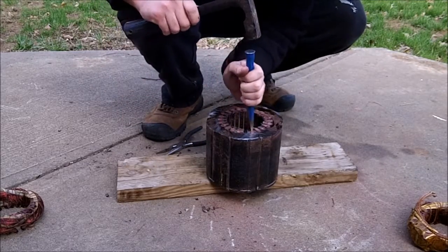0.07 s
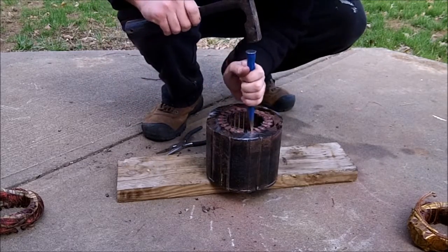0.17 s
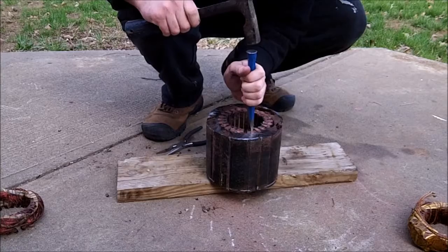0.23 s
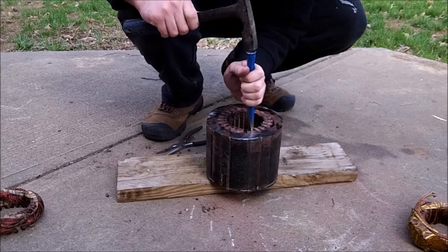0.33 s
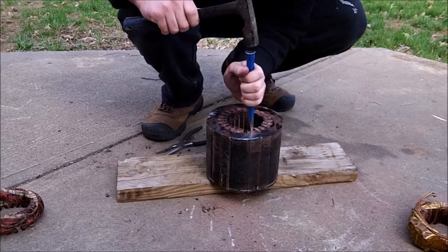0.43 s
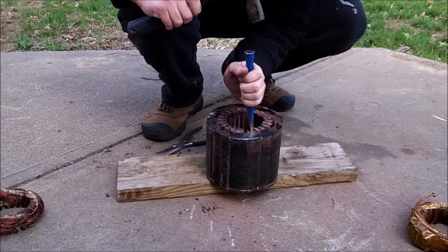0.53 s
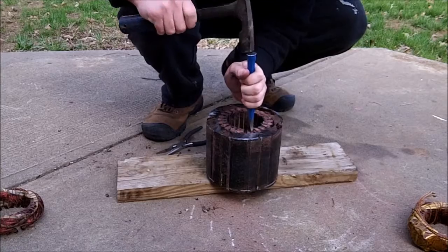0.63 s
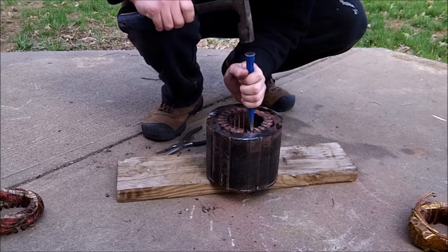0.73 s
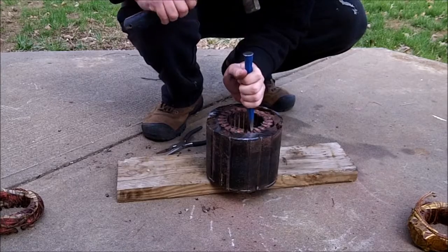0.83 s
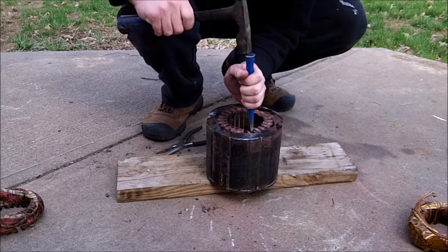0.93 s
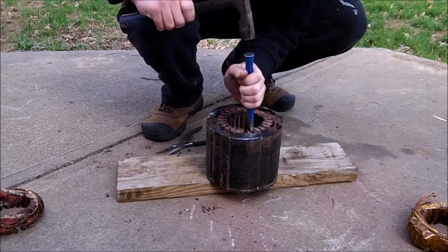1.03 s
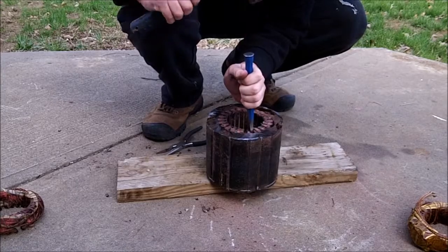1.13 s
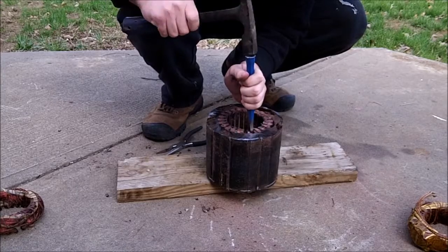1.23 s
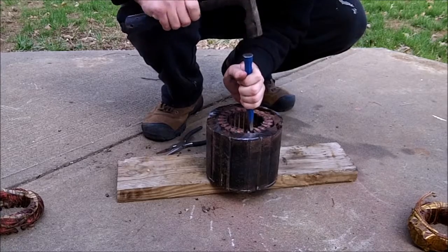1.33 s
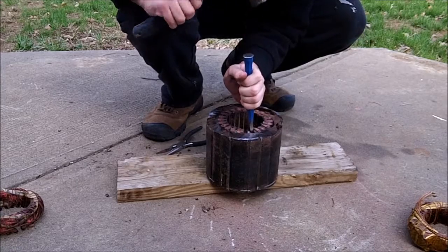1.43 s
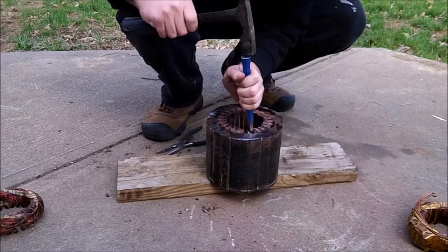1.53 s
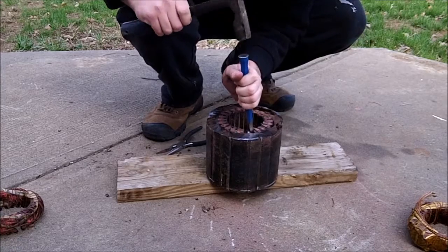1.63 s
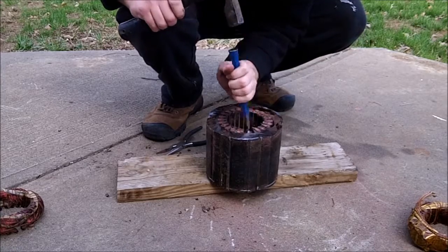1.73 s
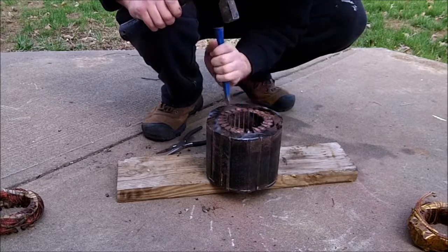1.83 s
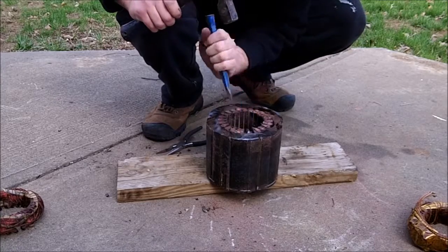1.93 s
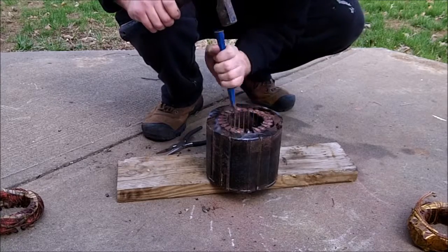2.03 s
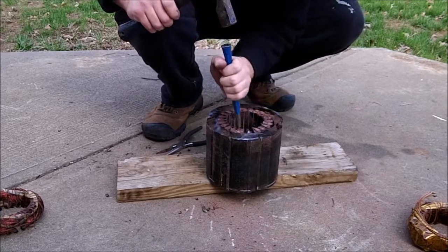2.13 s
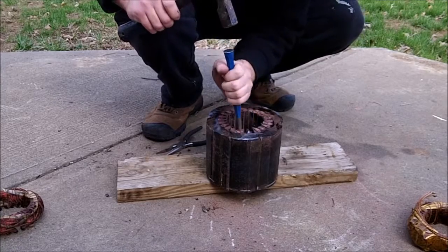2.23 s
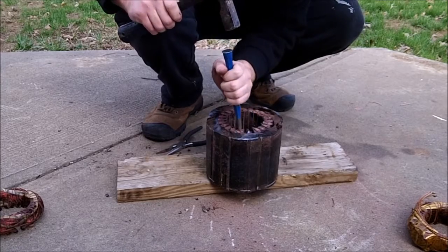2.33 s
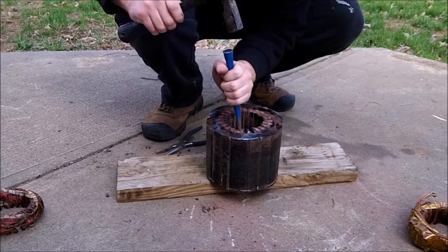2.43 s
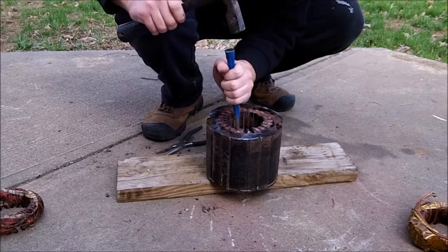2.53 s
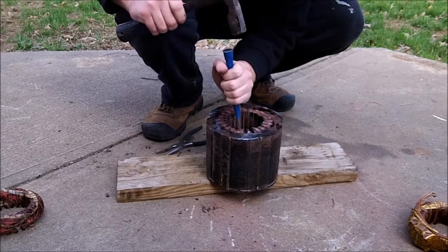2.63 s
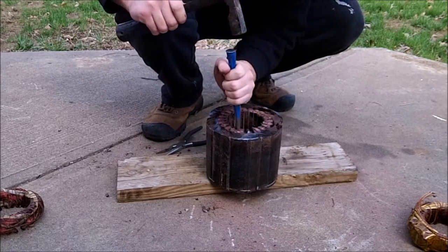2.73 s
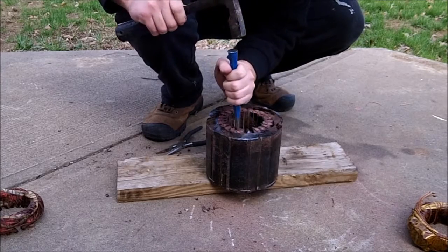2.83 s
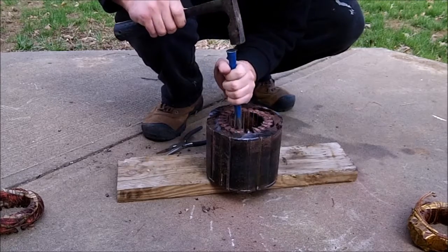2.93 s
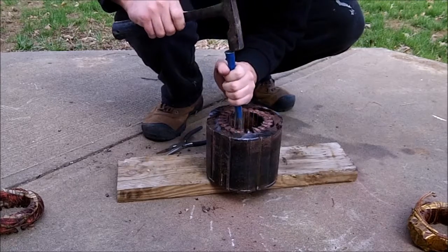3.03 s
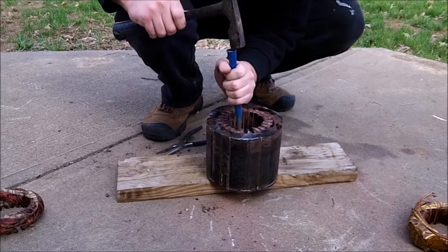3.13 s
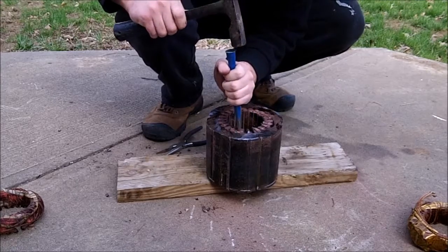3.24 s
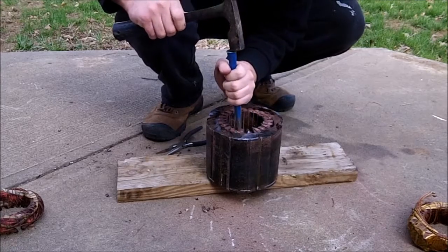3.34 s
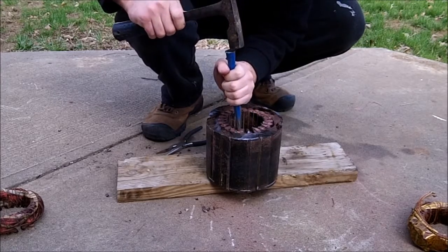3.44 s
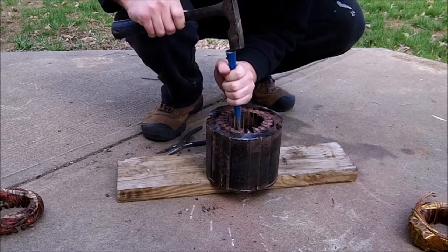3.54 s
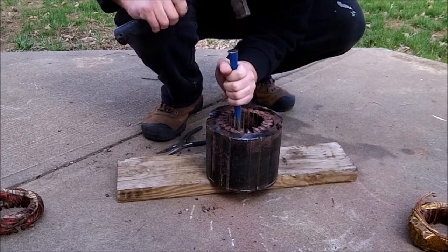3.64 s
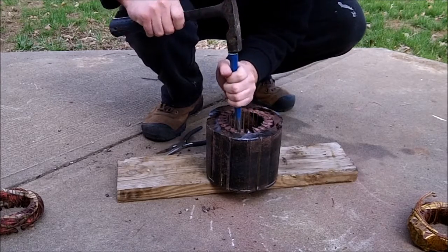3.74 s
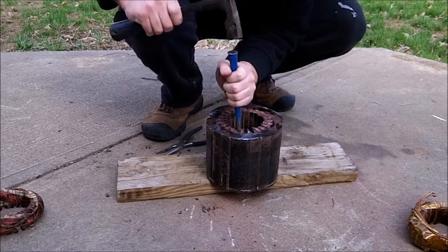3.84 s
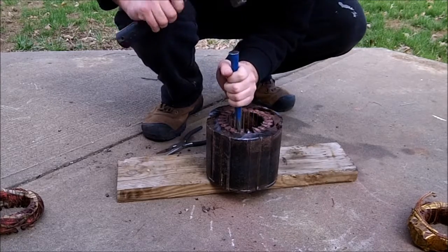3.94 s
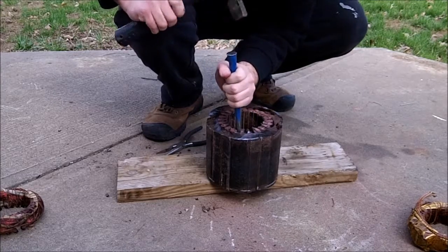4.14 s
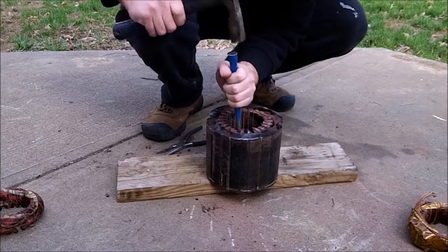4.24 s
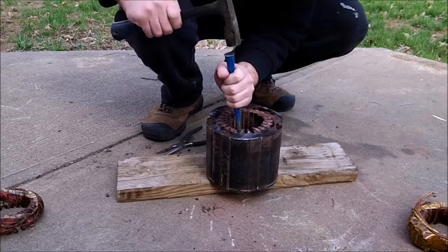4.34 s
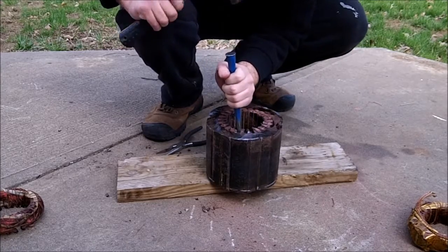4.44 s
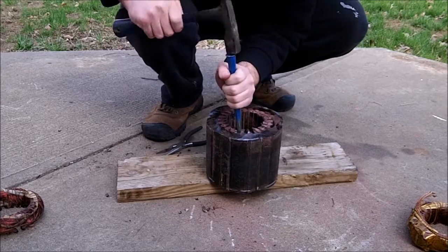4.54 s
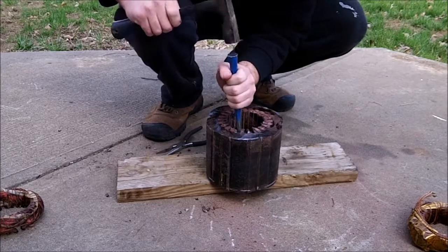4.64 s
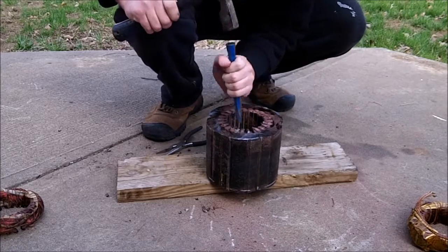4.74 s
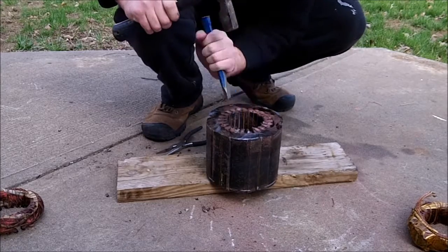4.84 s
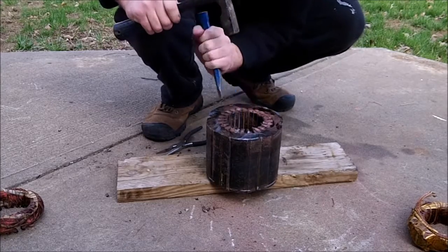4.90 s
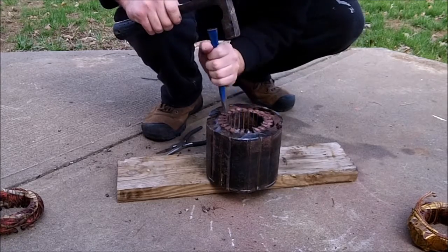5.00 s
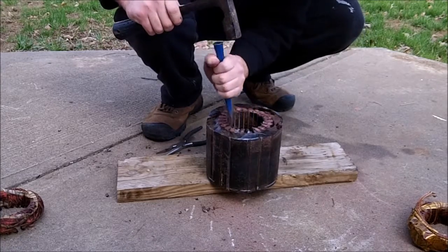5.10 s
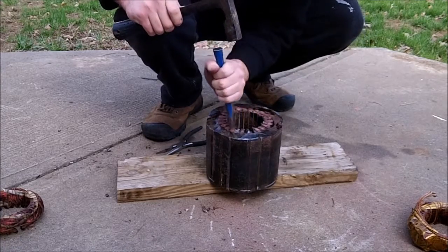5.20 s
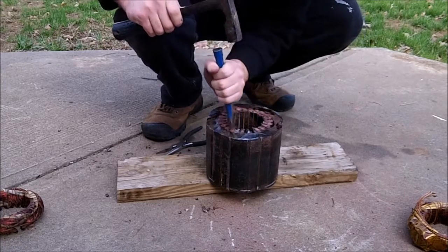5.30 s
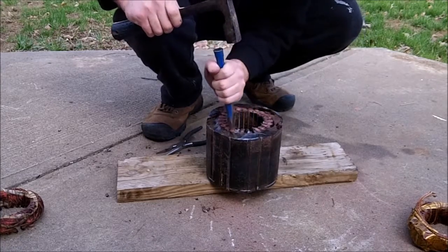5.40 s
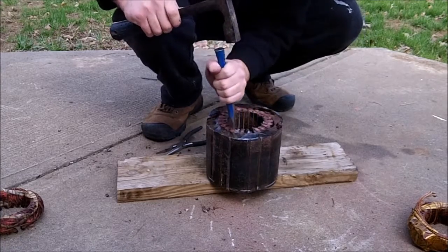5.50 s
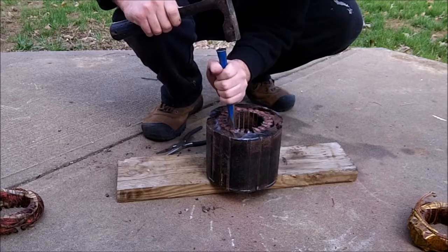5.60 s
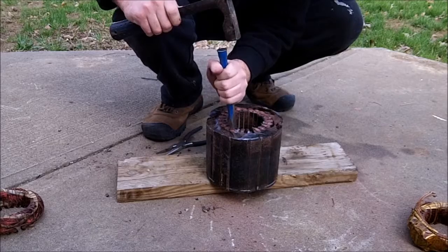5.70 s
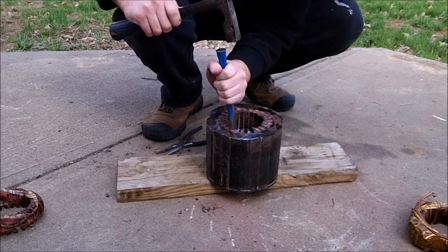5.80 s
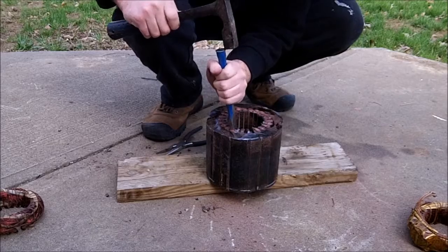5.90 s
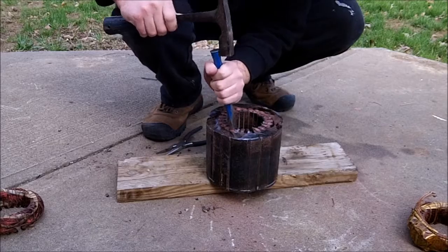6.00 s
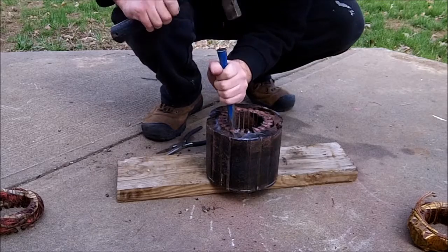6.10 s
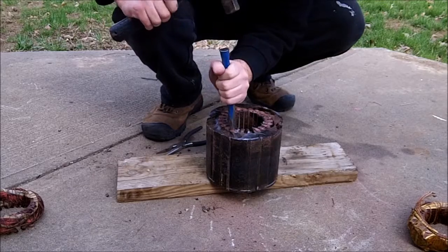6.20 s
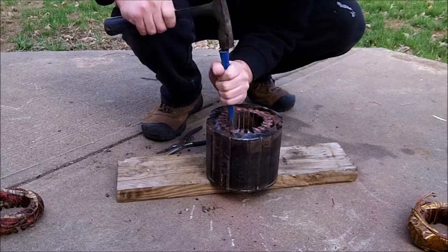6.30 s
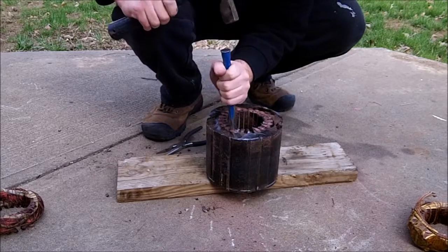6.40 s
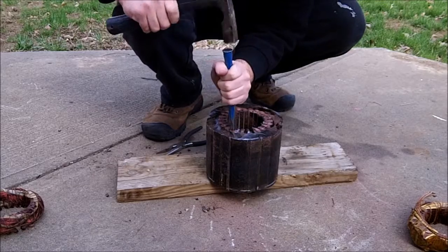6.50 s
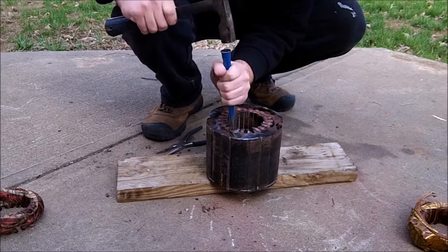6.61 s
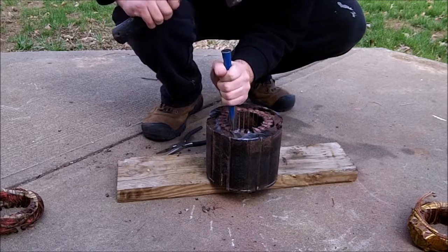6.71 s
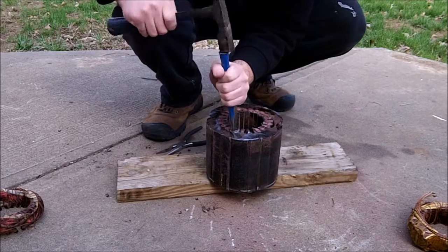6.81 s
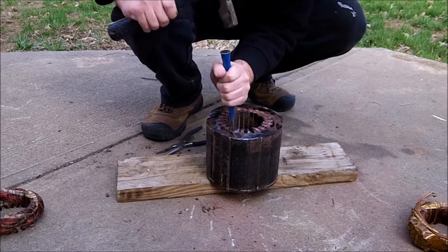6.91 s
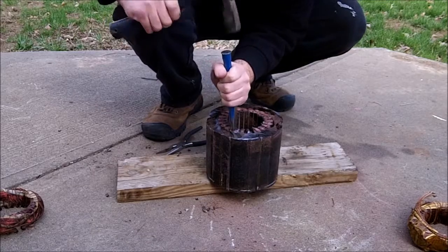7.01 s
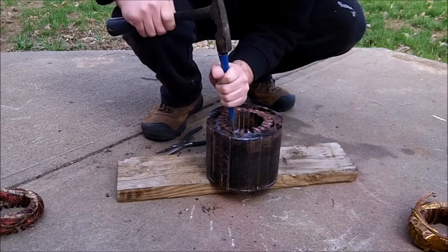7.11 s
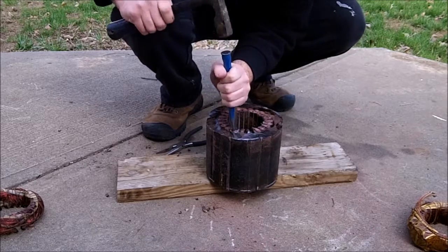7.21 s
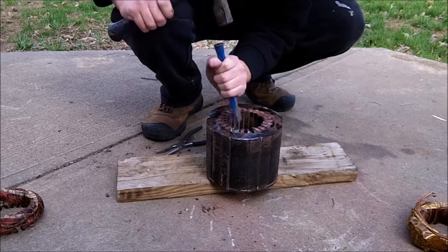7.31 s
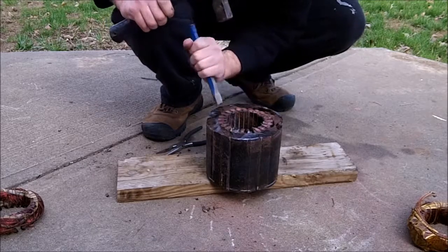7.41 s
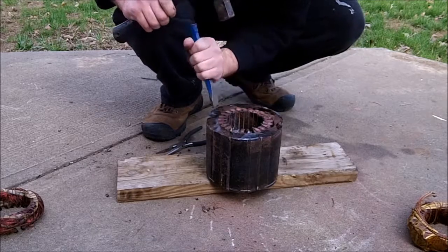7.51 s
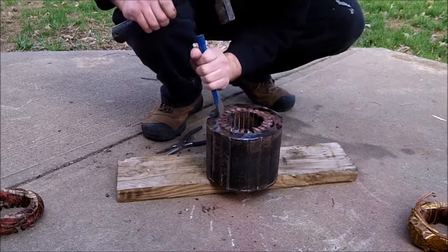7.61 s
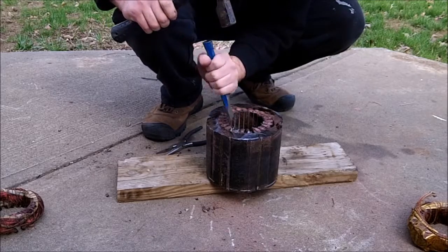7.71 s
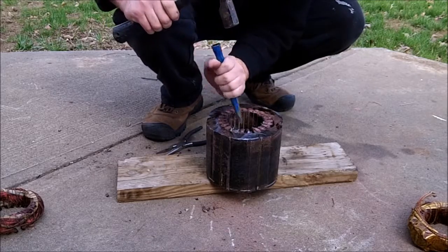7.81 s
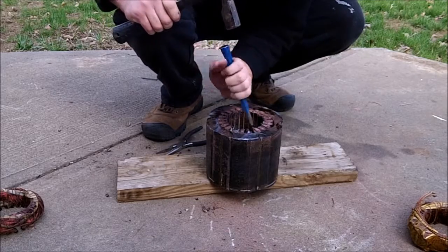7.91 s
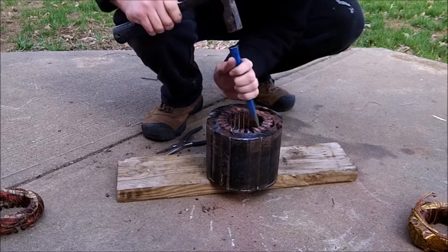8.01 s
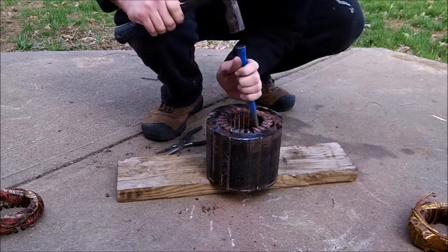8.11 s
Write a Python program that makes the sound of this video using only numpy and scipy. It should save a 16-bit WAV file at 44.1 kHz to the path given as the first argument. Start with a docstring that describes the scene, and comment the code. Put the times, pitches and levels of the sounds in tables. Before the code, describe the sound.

A hammer strikes a steel punch in three bursts of sharp, ringing clanks outdoors, with faint birds and distant traffic behind.

```python
"""A hammer drives a steel punch into a laminated iron core on a plank, outdoors on concrete.
Each contact rings punch, core, hammer and plank; as the punch sinks, its tip and overtones fade while
hammer and wedged modes grow. Each burst starts with a light seating tap. The punch nudges the core
now and then and squeaks twice as it shifts. Hard blows overload the microphone, whose gain control
ducks the yard noise. Far birds chirp and a distant engine hums."""
import sys
import numpy as np
from scipy import signal
from scipy.io import wavfile
from scipy.ndimage import uniform_filter1d, minimum_filter1d

SR = 44100
rng = np.random.default_rng(int(sys.argv[2]) if len(sys.argv) > 2 else 0)


def wav_record(signal):
    """Record a signal, one row per channel, as 16-bit PCM in the file named by sys.argv[1]."""
    frames = np.transpose(np.atleast_2d(signal))
    bounded = np.clip(frames, -1, 1)
    # unit amplitude maps onto the largest positive 16-bit level
    quanta = np.round(bounded * 32767).astype(np.int16)
    wavfile.write(sys.argv[1], SR, quanta)


N = 359415


def gain_of(db):
    return 10 ** (np.asarray(db) / 20)


def unit_rms(x):
    return x / np.sqrt(np.mean(x ** 2) + 1e-20)


def curve_at(points, hz):
    point_hz, value = np.transpose(points)
    return np.interp(np.log(hz + 1), np.log(point_hz + 1), value)


def add(mix, start_s, sound):
    part = mix[round(start_s * SR):][:len(sound)]
    part += sound[:len(part)]


def resonance(x, hz, width_hz):
    return signal.lfilter(*signal.iirpeak(hz, hz / width_hz, SR), x)


def bandpass(x, low_hz, high_hz):
    return signal.sosfilt(signal.butter(3, [low_hz, high_hz], "bandpass", fs=SR, output="sos"), x)


# Each row: frequency in Hz, relative noise density in dB.
TRAFFIC_SPECTRUM = [(15, -11.5), (25, 0.5), (71, -6), (240, -14), (350, -18.5), (539, -20), (744, -20.5),
                    (2070, -24.5), (2370, -25), (2710, -23), (2940, -25), (6590, -31.5), (7750, -37.5),
                    (11000, -29.5), (15600, -33.5)]

def far_traffic():
    """Traffic rumble and hiss: shaped noise, slightly patchy in time and frequency."""
    frames, hz = N // 256 + 5, np.fft.rfftfreq(1024, 1 / SR)
    real, imag, patches = rng.standard_normal((frames, 513, 3)).T
    patches = unit_rms(uniform_filter1d(uniform_filter1d(patches, size=12, axis=0), size=10, axis=1))
    density_db = curve_at(TRAFFIC_SPECTRUM, hz)[:, None] + 1.2 * patches
    spectra = (real + 1j * imag) * gain_of(density_db) * (hz < 15400)[:, None]
    return gain_of(-51) * unit_rms(signal.istft(spectra, nperseg=1024, noverlap=768)[1][:N])


# Each row: time in seconds, RMS level in dB.
ENGINE_LEVELS = [(0, -58), (1.8, -60), (2.2, -52), (3.1, -50), (3.9, -55), (5.1, -62.5), (8.15, -63.5)]

def engine_hum():
    """An engine passes far off: one low tone, wavering in pitch and level."""
    time_s, db = np.transpose(ENGINE_LEVELS)
    drift, swell = (unit_rms(resonance(resonance(rng.standard_normal(N), 3, 6), 3, 6)) for _ in range(2))
    hz = 63.5 + 3.7 * drift
    drone = (1 + .24 * swell) * np.sin(2 * np.pi * np.cumsum(hz) / SR)
    return gain_of(np.interp(np.arange(N) / SR, time_s, db)) * unit_rms(drone)


# Each row: start in seconds, level in dB, start and end pitch in Hz, length in seconds.
CHIRPS_AND_SQUEAKS = [(0.017, -51.5, 4260, 3590, 0.05), (0.05, -63, 3060, 2320, 0.025),
                      (0.312, -54.5, 4400, 3480, 0.075), (0.344, -70.5, 3150, 2300, 0.029),
                      (0.557, -74.5, 7800, 7400, 0.16), (1.95, -59, 6000, 6960, .03),
                      (3.045, -52.5, 3980, 3370, 0.043), (3.216, -55.5, 4060, 3800, 0.051),
                      (5.809, -61, 4150, 3870, 0.076), (5.902, -52, 4360, 3870, 0.033),
                      (6.144, -52.5, 4130, 3820, 0.04), (8.11, -61, 6000, 6850, 0.056)]

def chirp_or_squeak(db, start_hz, end_hz, length_s):
    """A hoarse, wavering glide: falling for a far bird, rising for the scrape of the shifting punch."""
    progress = np.linspace(0, 1, round(length_s * SR))
    hz = end_hz + (start_hz - end_hz) * np.exp(-progress / .33)
    hz += 400 * uniform_filter1d(rng.standard_normal(len(hz)), size=60)
    waver = 1 + .4 * np.sin(2 * np.pi * (85 * progress * length_s + rng.random()))
    whistle = np.sin(2 * np.pi * np.cumsum(hz) / SR)
    return gain_of(db) * waver * whistle * signal.windows.tukey(len(hz), .5)


# Each row: frequency in Hz, reverb T60 in seconds.
YARD_DECAY = [(500, 0.15), (2000, 0.42), (3000, 0.68), (6000, 0.46), (9000, 0.13)]

def yard_reverb(x):
    """Sparse reflections, each band dying at its own rate; three tails take turns."""
    impulses = np.zeros((3, SR))
    arrivals = np.arange(300, SR - 20, 20) + rng.integers(0, 20, (3, (SR - 301) // 20))
    np.put_along_axis(impulses, arrivals, rng.choice([-1., 1.], arrivals.shape), 1)
    hz, t, spectra = signal.stft(impulses, SR, nperseg=256)
    decay = gain_of(-60 * t / curve_at(YARD_DECAY, hz)[:, None])
    tails = signal.istft(spectra * decay, SR, nperseg=256)[1]
    tails /= np.linalg.norm(tails[0])
    turns = np.arange(N) / SR * 1.3 + np.arange(3)[:, None] / 3
    crossfade = np.sqrt(2 / 3) * np.cos(2 * np.pi * turns)
    return signal.fftconvolve(x * crossfade, tails, axes=1).sum(0)[:N]


# Each row: delay in seconds, gain in dB.
NEAR_ECHOES = [(.0013, -11.5), (.0031, -13), (.0052, -22.5)]

def with_near_echoes(x):
    """Direct sound plus reflections off slab, boots and legs."""
    near = x.copy()
    for delay_s, db in NEAR_ECHOES:
        add(near, delay_s, gain_of(db) * x)
    return near


# Each row: start in seconds, level in dB, ring frequency in Hz, T60 in seconds.
PUNCH_NUDGES = [(1.252, -39.5, 2040, 0.026), (1.812, -48, 2014, 0.033), (1.968, -38, 1380, 0.041),
                (4.298, -40.5, 1294, 0.029), (7.601, -38.5, 4800, 0.0042), (7.945, -50, 743, 0.058),
                (8.099, -41, 2920, 0.016)]

def punch_nudge(db, hz, t60_s):
    """The punch tip touches the core: a tick and one damped ring."""
    t = np.arange(3000) / SR
    tick = .83 * bandpass(rng.standard_normal(len(t)), 900, 6500) * np.exp(-t / .002)
    ring = gain_of(-60 * t / t60_s) * np.sin(2 * np.pi * hz * t)
    return gain_of(db) * (tick + ring)


# Modes by part. Each row: frequency in Hz, relative level in dB, base T60 in seconds.
PLANK_MODES = [(450, -26, .01), (800, -17, .01), (1290, -16, .018), (1750, -12, .025)]
CORE_MODES = [(2245, -9, .03), (2410, -4, .013), (2620, -7, .012)]
PUNCH_TIP_MODES = [(2050, -10, .065)]
PUNCH_RING_MODES = [(2855, -11, .085), (2905, -3, .016), (2868, -35, .45)]
PUNCH_OVERTONES = [(5160, -6, .013), (5400, -14, .05), (5620, 0, .02), (6000, -7, .009), (6715, -24, .06)]
WEDGED_PUNCH_MODES = [(4900, -4.5, 0.024), (6254, -4, .012)]
HAMMER_FACE_MODES = [(3330, -3, .012), (3790, -4, .012), (4250, -6, .01), (4720, -5, .011), (4600, 7, .003)]
HAMMER_HEAD_MODES = [(9660, -27.5, 0.038), (14200, -39.5, .05)]

def strike(peak_db, *, plank_db, tip_db, core_db, ring_db, hammer_db, overtone_db, wedged_db,
           rattle_db, t60_scale, overtone_ratio=1):
    """One contact rings the modes of every part; the loose punch rattles them on."""
    t = np.arange(16000) / SR
    overtones = [(hz * overtone_ratio, db, t60_s) for hz, db, t60_s in PUNCH_OVERTONES]
    parts = [(plank_db, PLANK_MODES), (tip_db, PUNCH_TIP_MODES), (core_db, CORE_MODES),
             (ring_db, PUNCH_RING_MODES), (hammer_db, HAMMER_FACE_MODES), (overtone_db, overtones),
             (hammer_db, HAMMER_HEAD_MODES), (wedged_db, WEDGED_PUNCH_MODES)]
    sound = np.zeros(len(t))
    for part_db, modes in parts:
        for k, (hz, db, t60_s) in enumerate(modes):
            spot_db, detune, phase_rad = rng.standard_normal(3) * [1.5, .003, .5]
            envelope = gain_of(part_db + db + spot_db - 60 * t / (t60_s * t60_scale))
            polarity = -(-1) ** k
            sound += polarity * envelope * np.sin(2 * np.pi * hz * (1 + detune) * t + phase_rad)
    sound *= 1 - np.exp(-t / .00012)  # steel on steel loads almost at once
    grip_s = .007  # the fist damps the steel unevenly
    flutter = unit_rms(uniform_filter1d(rng.standard_normal(len(t)), round(grip_s * SR)))
    sound *= 1 + flutter * (1 - np.exp(-t / grip_s))
    rattle = rng.standard_normal(len(t)) * gain_of(-60 * t / .09) * (1 - np.exp(-t / .008))
    sound += gain_of(rattle_db) * signal.fftconvolve(sound, rattle)[:len(t)] / np.linalg.norm(rattle)
    sound = bandpass(sound, 330, 13000)
    return gain_of(peak_db) * sound / abs(sound).max()


# Each row: start in seconds, peak in dB, relative plank, tip, core and punch ring levels in dB, T60 scale.
LIGHT_TAPS = [(0.4102, -4.5, -0.5, 5, 9, 4, 0.59), (3.397, -11.5, 4.5, -3.5, 1, 10, .7),
              (4.7899, -16.5, -23, 11, 5.5, 5.5, 0.67), (5.9984, -2, 2, -17, 9, 2.5, 0.37),
              (7.362, -31, -20, 14, -2, 1, .8)]

def light_tap(peak_db, plank_db, tip_db, core_db, ring_db, t60_scale):
    """A light contact hardly sounds the hammer; the loose punch springs back against it once."""
    first = strike(peak_db, plank_db=plank_db, tip_db=tip_db, core_db=core_db, ring_db=ring_db,
                   hammer_db=-7, overtone_db=-2, wedged_db=-21.5, rattle_db=-21.5,
                   t60_scale=t60_scale, overtone_ratio=.93)
    both = first.copy()
    add(both, start_s=.0019, sound=gain_of(-11) * first)
    return both * abs(first).max() / abs(both).max()


# Each row: start in seconds, peak in dB, punch depth from 0 to 1, relative punch ring level in dB.
HARD_BLOWS = [(0.7195, 6, 0, 3), (1.0118, 7, 0.4, 6), (1.2950, 9, 0.91, -4), (1.5729, 9, .9, 1),
              (3.8198, 8.5, 0.09, 3.5), (4.0797, 8, .3, 1.5), (4.3333, 9, .8, -2), (4.5850, 9, 1, -2.5),
              (6.347, 9, .1, 0.5), (6.6001, 9.5, 0.4, -3), (6.8569, 7.5, 0.2, 3), (7.1083, 8, 0.99, -3.5)]

def hard_blow(peak_db, depth, ring_db):
    """As the punch sinks, its tip and free overtones give way to hammer and wedged modes."""
    def by_depth(seated, sunk):
        return seated + (sunk - seated) * depth

    return strike(peak_db, plank_db=-1, core_db=-.5, ring_db=ring_db, rattle_db=-12.5,
                  tip_db=by_depth(-6.5, -9.5), overtone_db=by_depth(0, -11.5),
                  hammer_db=by_depth(-2.5, 0), wedged_db=by_depth(-14, .5), t60_scale=by_depth(.72, .78))


def scene():
    """Struck steel, chirps and squeaks in the yard, over traffic and engine."""
    steel, glides = np.zeros(N), np.zeros(N)
    for events, source in (HARD_BLOWS, hard_blow), (LIGHT_TAPS, light_tap), (PUNCH_NUDGES, punch_nudge):
        for start_s, *settings in events:
            add(steel, start_s, source(*settings))
    for start_s, *settings in CHIRPS_AND_SQUEAKS:
        add(glides, start_s, chirp_or_squeak(*settings))
    reverb = yard_reverb(gain_of(-26.5) * steel + gain_of(-6) * glides)
    return (with_near_echoes(steel) + glides + reverb + far_traffic() + engine_hum())[None]


def ducking_db(x, attack_s=.0032, hold_s=.021, release_db_per_s=107):
    """Gain reduction on overload: it sets in fast, holds, then recovers."""
    cut_db = np.clip(8 * (20 * np.log10(abs(x) + 1e-9) + 1), 0, 15)
    shift = round(hold_s * SR)
    cut_db = -minimum_filter1d(-cut_db, 2 * shift + 1, origin=shift, mode="constant")
    ramp_db = np.arange(N) * release_db_per_s / SR
    cut_db = np.maximum.accumulate(cut_db + ramp_db) - ramp_db
    pole = np.exp(-1 / (attack_s * SR))
    return signal.lfilter([1 - pole], [1, -pole], cut_db)


# Each row: centre in Hz, width in Hz, depth from 0 to 1.
MIC_NOTCHES = [(7950, 810, 0.7), (11100, 490, .5)]

def record(dry):
    """Above the bass, overload ducks the gain and peaks saturate; the microphone notches the treble."""
    split_hz, top_hz = 170, 16570
    bass = signal.sosfiltfilt(signal.butter(2, split_hz, fs=SR, output="sos"), dry[0])
    ducked = (dry[0] - bass) / gain_of(ducking_db(dry[0]))
    saturated = .93 * ducked / (1 + abs(ducked) ** 4) ** (1 / 4)
    x = bass + signal.sosfilt(signal.butter(2, split_hz, "highpass", fs=SR, output="sos"), saturated)
    for hz, width_hz, depth in MIC_NOTCHES:
        x = x - depth * resonance(x, hz, width_hz)
    return signal.oaconvolve(x, signal.firwin(511, top_hz, window=("kaiser", 9), fs=SR), "same")[None]


dry = scene()
out = record(dry)
wav_record(out)
```